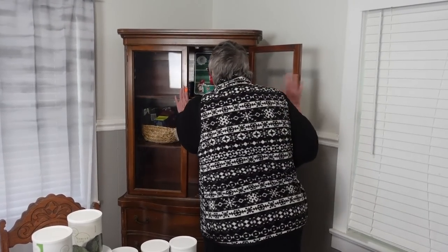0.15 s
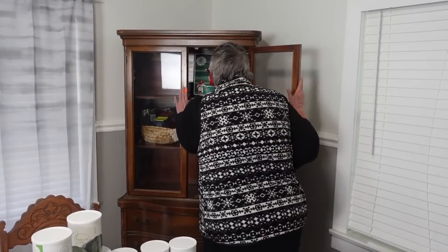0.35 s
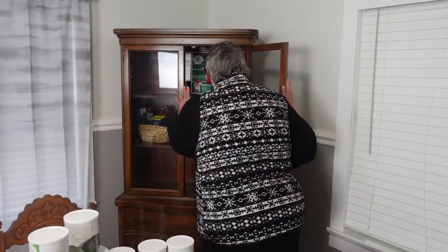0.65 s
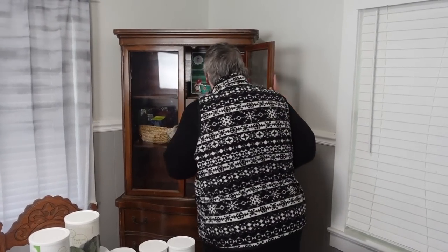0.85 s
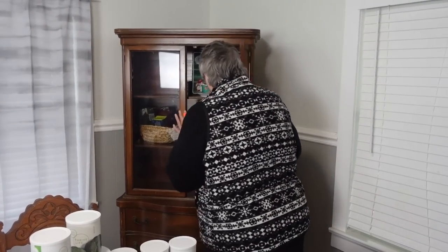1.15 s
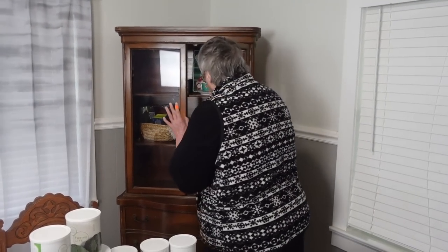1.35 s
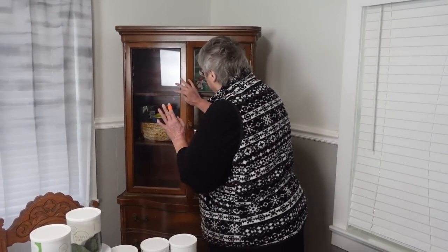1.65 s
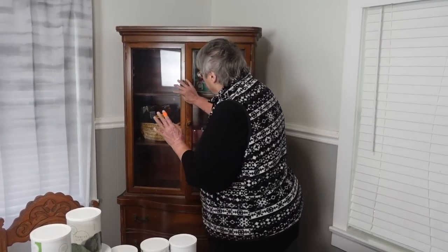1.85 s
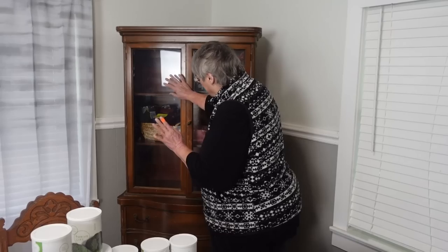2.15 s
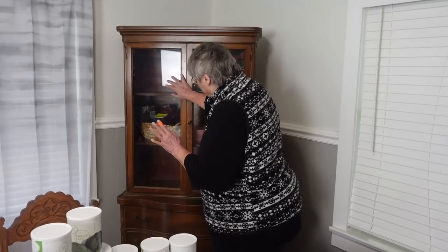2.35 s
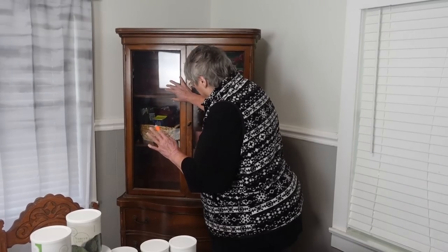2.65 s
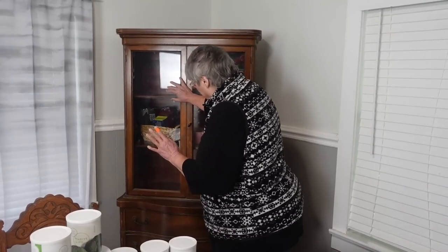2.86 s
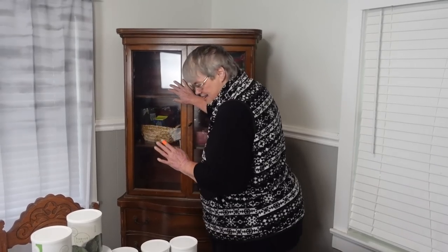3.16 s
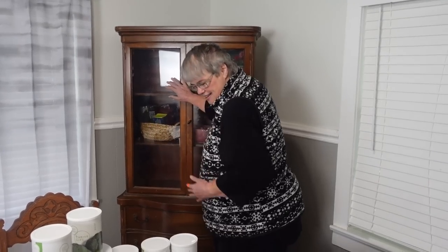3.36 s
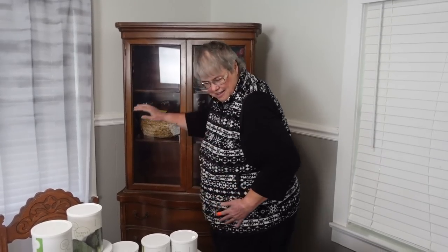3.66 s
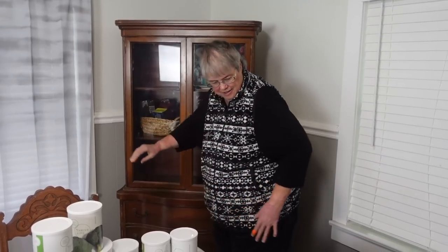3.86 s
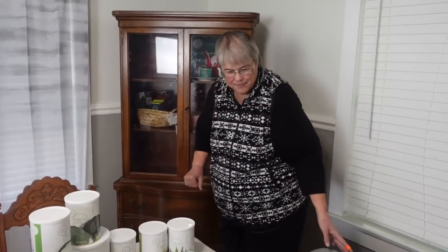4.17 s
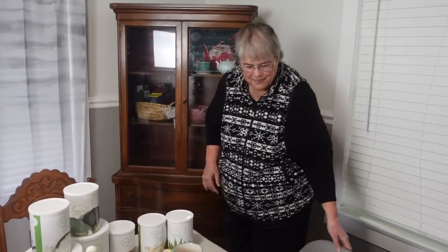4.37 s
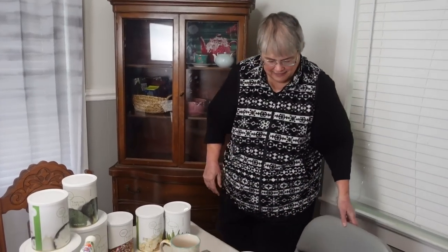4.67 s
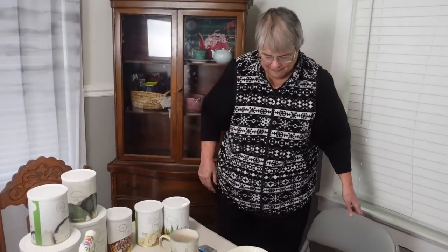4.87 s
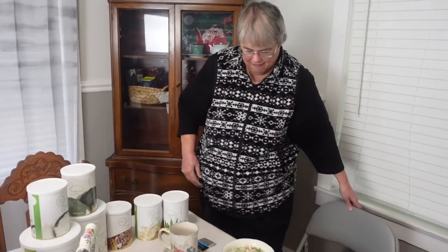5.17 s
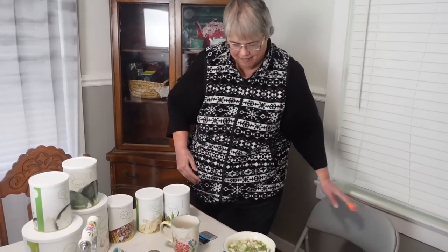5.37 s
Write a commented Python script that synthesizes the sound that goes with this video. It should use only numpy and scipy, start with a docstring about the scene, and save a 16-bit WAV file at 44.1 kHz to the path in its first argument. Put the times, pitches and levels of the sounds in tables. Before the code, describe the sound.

A bare dining room with a short, lively ring, heard from one microphone over deep unsteady air rumble and faint hiss. At about 0.3 s the left glazed cabinet door shuts with a tight burst of three hard woody knocks, its panes rattling as they fade. A tiny tick comes at 0.5 s, then near quiet. Sleeves swish from 1.4 to 2.3 s, with light low bumps of hands from 1.95 s. The right door closes at 2.4 to 2.55 s, with deeper, boomy thuds. Faint taps and handling knocks follow at 2.85 and around 3.2 s, with more cloth rustle from 3.4 to 4.5 s. A soft step falls near 4.1 s. From 4.5 s a folding chair is nudged, juddering and scraping grittily with a slight squeal and dry ticks. Heavy bumps at 4.9, 4.97 and 5.1 s are the loudest, ringing away under swollen hiss until 5.5 s.

```python
"""Two glazed doors of a wooden cabinet are pushed shut, one after the other, in a bare dining room.
Sleeves swish, hands bump the frames, then a folding chair is leaned on: it judders over the floor and bumps.
Blows are noise cracks and ringing tones that fade with the room; cloth and friction are shaped noise.
The chair's judder is a run of uneven slips shaking its frame. Small dry ticks are short noise bursts.
Air rumbles under a hiss that sinks, then swells while the chair moves; a limiter flattens the loudest peaks."""
import sys
import numpy as np
from scipy import signal
from scipy.io import wavfile
from scipy.ndimage import uniform_filter1d, minimum_filter1d

SR = 44100
rng = np.random.default_rng(int(sys.argv[2]) if len(sys.argv) > 2 else 0)


def generate_wav(sig):
    """Save sig (samples, or channels by samples) to the path in sys.argv[1] as 16-bit PCM at SR."""
    pcm = np.round(np.clip(np.atleast_2d(sig).T, -1, 1) * 32767).astype(np.int16)
    wavfile.write(sys.argv[1], SR, pcm)


N = 243431  # length of the scene in samples

# Deep rumble of the air. Each row: frequency in Hz, strength in dB per Hz (relative).
RUMBLE_COLOUR = [(12, 8.5), (20, 13.5), (30, -19), (42, -9), (60, -20.5), (100, -39)]
# Level of the background hiss, swelling late with the fading sound of the chair.
# Each row: time in seconds, level in dB.
HISS_LEVEL = [(0.2, -40), (0.8, -46.5), (1.4, -45), (2.95, -47.5), (3.4, -43.5), (4.0, -46), (4.5, -38),
              (5.25, -33.5), (5.52, -37)]
# Colour of the background hiss. Each row: frequency in Hz, strength in dB per Hz (relative).
HISS_COLOUR = [(41, -41), (70, 2), (155, -12.5), (293, -8.5), (336, -13.5), (620, -18), (892, -20.5),
               (1100, -21.5), (1610, -23), (1760, -22), (1980, -22.5), (4800, -31.5), (16000, -49)]
# How long the room rings. Each row: frequency in Hz, time to fade by 60 dB in seconds.
ROOM_FADE = [(60, 0.52), (200, 0.55), (600, 0.54), (2000, 0.63), (5000, 0.7), (9000, 0.54), (16000, 0.4)]

# Strokes of cloth on cloth. Each row: start in seconds, attack in seconds, hold in seconds,
# level in dB, brightness in dB (hiss against the soft body).
SWISHES = [(0.828, 0.17, 0.2, -60.5, 7.5), (1.25, .02, .015, -58, 0), (1.418, 0.038, .015, -48.5, -5),
           (1.487, 0.12, 0.083, -35, -0.5), (1.907, 0.021, .07, -38, -1), (1.937, 0.12, 0.078, -29, -3.5),
           (2.314, 0.16, 0.052, -33, -4.5), (3.437, 0.0056, 0.009, -34, -8), (3.444, 0.08, 0.054, -38, 3),
           (3.786, 0.06, 0.019, -35.5, -3), (4.074, 0.026, 0.032, -30.5, 0), (4.235, .036, 0.043, -40.5, 4),
           (4.394, 0.016, 0.0055, -35.5, -3.5), (4.474, .014, 0.018, -44, -2)]
# Colour of rubbed cloth. Each row: frequency in Hz, strength in dB per Hz (relative).
CLOTH_COLOUR = [(150, -46), (250, -1.5), (319, -3.5), (360, 0), (436, -2.5), (547, 0), (597, -2.5),
                (955, -1.5), (1180, -3.5), (1580, -4), (4490, -7), (12300, -27.5), (16000, -28)]
# Small dry ticks. Each row: start in seconds, relative level in dB, lowest frequency in Hz.
TICKS = [(0.5094, -29, 4000), (1.262, -43, 4000), (2.44, -15, 11000), (2.5554, -38, 11000),
         (2.6544, -32, 9000), (2.946, -43, 1500), (3.095, -30.5, 600), (3.44, -32, 5000),
         (4.4545, -33, 10600), (4.4635, -35, 9500), (4.536, -25, 3500), (4.683, -22, 6500),
         (4.897, -20, 5000)]

# Shoves that drag the chair. Each row: start in seconds, attack in seconds, hold in seconds,
# judder in dB (relative), friction in dB (relative), average slips per second.
DRAGS = [(4.39, 0.022, 0.011, -60, -39, 55), (4.486, .13, 0.034, -22, -29.5, 80),
         (4.71, 0.051, 0.08, -28.5, -29.5, 73), (4.896, 0.033, 0.1, -21, -32, 100),
         (5.072, 0.016, .04, -16.5, -30, 125)]
# Squeal of the chair's feet. Each row: frequency in Hz, width in Hz, level in dB (relative).
SQUEAL_LINES = [(1387, 34, 2), (1570, 45, -2), (1950, 79, -6.5), (2130, 61, -3), (2460, 66, -6),
                (2890, 120, -14), (7300, 400, -36), (12000, 2000, -10)]
# Gritty hiss of the dragging feet. Each row: frequency in Hz, strength in dB per Hz (relative).
GRIT_COLOUR = [(500, 5), (1000, 1.5), (2200, -29), (3200, -6), (6000, -16), (9000, -16.5), (13000, -30),
               (16000, -24)]

# Steps towards the chair, then its bumps. Each row: start in seconds, strength in dB,
# weight in dB (bass against the knock), hardness in dB (treble against the knock),
# contact in dB (the short dead knock against the ring).
CHAIR_BLOWS = [(4.079, -30.5, 4.5, -11, 14), (4.205, -41, 4.5, 2, 8), (4.285, -49, 11.5, -13, 3),
               (4.406, -47, 4, 11.5, 1), (4.478, -31, -3.5, -15, -14), (4.520, -21.5, -11.5, -18, 7),
               (4.685, -29, -22, -7, 2.5), (4.845, -27.5, -6, -34, -13), (4.8950, -8, -6, -10.5, -7),
               (4.966, -11.5, 2, -15, 0), (5.081, -6, 1, -17.5, 6.5), (5.118, -12, 4, -16.5, -6)]
# Blows on the left and right doors. Each row: start in seconds, strength in dB,
# weight in dB, hardness in dB, contact in dB, as for the chair.
LEFT_BLOWS = [(0.135, -34.5, -4.5, -27, -16), (0.2785, -12, 1.5, -1.5, 0), (0.303, -10, -2, -32, 12.5),
              (0.353, -11, -3, -9.5, 6)]
RIGHT_BLOWS = [(1.951, -35, 5.5, -5, 4), (2.048, -27.5, 10.5, -7.5, 0), (2.135, -31.5, 6.5, -1, -10),
               (2.215, -42.5, 15.5, -17, -4), (2.315, -34, 11, -10.5, -19), (2.4250, -12, 4, .5, -1),
               (2.495, -15, -7, -12, 1), (2.545, -20.5, 1, -11, 8), (2.853, -36.5, 4, -35, 8.5),
               (3.182, -28, -5, -29, 5.5), (3.189, -31.5, -9, -10, 9), (3.213, -34, 6.5, -10, 10),
               (3.4405, -38.5, -3, 1, 9.5)]
# Thud, knock, clack and top snap. Each row: lowest frequency in Hz, highest frequency in Hz.
REGISTERS = [(35, 150), (150, 900), (900, 7000), (7000, 17000)]
# Colour of each struck thing. Each row: frequency in Hz, strength in dB per Hz (relative).
CHAIR_COLOUR = [(35, -40), (60, -15.5), (108, -14.5), (180, -16.5), (287, -9.5), (315, -9.5), (437, -9),
                (469, -14.5), (1340, -17), (1620, -12.5), (2970, -24.5), (4320, -26.5), (10300, -48),
                (12400, -45), (16000, -70)]
LEFT_COLOUR = [(35, -35), (60, -30), (98, -1.5), (156, -21), (180, -7.5), (245, 1.5), (480, -11.5),
               (607, -13.5), (682, -22), (749, -13.5), (1140, -15), (1860, -17.5), (2650, -24),
               (5090, -18.5), (16000, -39)]
RIGHT_COLOUR = [(24, -31), (40, 11.5), (64, 3.5), (176, -3), (262, -5), (337, -6.5), (372, -9), (467, -5.5),
                (529, 5), (585, -10.5), (1340, -20), (1760, -23), (3650, -30), (4800, -28), (16000, -64)]
# Tones each thing rings with. Each row: frequency in Hz before a small random shift,
# level in dB (relative), time to fade by 60 dB in seconds.
CHAIR_MODES = [(114.4, 0, 0.31), (164.5, -2, 0.18), (209.2, 0.5, 0.27), (236.6, -5, 0.33), (289, 1.5, 0.37),
               (346, -17, 0.25), (370, -31, 0.67), (433, -28, 0.17), (505, -16.5, 0.57),
               (564.5, -5.5, 0.38), (680, -34, .5), (978, -19, 0.56), (1412, -21, 0.97), (1476, -15, 0.96),
               (1743, -7.5, 0.49), (1790, -33, .6), (11950, -48, .4)]
LEFT_MODES = [(82, -15.5, 1.23), (101.6, -6, 0.6), (189.2, -4, 0.63), (213, -1, 0.49), (249, -2.5, 0.46),
              (338, -3.5, 0.31), (447, -15.5, 0.55), (531, -12, 0.54), (759, -4.5, 0.22), (976, -6.5, 0.26),
              (1234, -14, 0.36), (1284, -24, 1), (1927, -11, 0.26), (2304, -4.5, 0.16), (4678, -32, .35),
              (5577, -28, .5), (5660, -28, .5)]
RIGHT_MODES = [(59.8, 5, 0.45), (83.1, 2, 0.69), (121, 2.5, 0.7), (229.7, 0.5, 0.68), (258, 3.5, 0.61),
               (374.7, 4, 0.46), (529, 2.5, 0.56), (625, -15, 0.71), (723, -4, 0.42), (896, -11.5, 0.74),
               (1287, -13, 0.54), (2137, -9, 0.29), (3240, -6, 0.11), (3892, -12, 0.28), (4830, -9.5, 0.36)]

CUTOFF_HZ = 15850
RUMBLE_DB, GUST_DB = -19.5, 1.5   # middle level of the rumble, size of its gusts
SWISH_RELEASE_DB_PER_S, SHEEN_RELEASE_DB_PER_S = 107, 134   # the room swallows the very top sooner
DRAG_RELEASE_DB_PER_S = 116
SNAP_GROWTH = 0.64   # extra dB of top snap for each dB of clack


def from_db(db):
    """Turn decibels into a gain."""
    return 10 ** (np.asarray(db) / 20)


def rms_one(x):
    """Scale a sound to an average (RMS) level of 1."""
    return x / np.sqrt(np.mean(x ** 2) + 1e-20)


def early_rms_one(x):
    """Scale a sound to level 1 over its first sixteenth of a second."""
    return x / np.sqrt(np.mean(x[:SR // 16] ** 2))


def at_hz(points, hz):
    """Read a table at a frequency, with straight lines on a log-frequency axis."""
    table_hz, values = np.array(points).T
    return np.interp(np.log(hz), np.log(table_hz), values)


def band(x, low, high, order=2):
    """Keep only the frequencies between low and high."""
    edges = [low, min(high, .47 * SR)]
    return signal.sosfilt(signal.butter(order, edges, "band", fs=SR, output="sos"), x)


def noise(colour, size, t60=None):
    """Noise in bands of the given colour; with a fade table each band dies away at its own pace."""
    edges = np.geomspace(11, 17500, 28)
    white = rng.standard_normal((2, size + SR // 2))   # the extra half second lets the filters settle
    t = np.arange(size) / SR
    out = 0
    for k, (low, high) in enumerate(zip(edges, edges[1:])):
        hz = np.sqrt(low * high)
        if colour[0][0] <= hz <= colour[-1][0]:
            part = rms_one(band(white[k % 2], low, high)[-size:])   # neighbours use separate noise
            part = part * np.sqrt(high - low) * from_db(at_hz(colour, hz))
            if t60 is not None:
                part = part * np.exp(-np.log(1000) * t / at_hz(t60, hz))
            out = out + part
    return out


def slow_chance(low_hz, high_hz):
    """A random wander with an average (RMS) size of 1."""
    return rms_one(band(rng.standard_normal(N + SR), low_hz, high_hz)[SR:])


def stroke(start_s, attack_s, hold_s, release_db_per_s):
    """Level of one rubbing movement: it gathers speed, holds, and dies away with the room."""
    t = np.arange(N) / SR - start_s
    rise = np.sin(np.pi / 2 * np.clip(t / attack_s, 0, 1)) ** 2
    return rise * from_db(-release_db_per_s * np.clip(t - attack_s - hold_s, 0, 2))


def air():
    """Rumble that swells and sinks at random, under a hiss that sinks and then swells while the chair moves."""
    gusts = from_db(RUMBLE_DB + GUST_DB * slow_chance(3.0, 5.2))
    rumble = gusts * rms_one(noise(RUMBLE_COLOUR, N))
    times, levels_db = np.transpose(HISS_LEVEL)
    hiss_gain = from_db(np.interp(np.arange(N) / SR, times, levels_db))
    return rumble + hiss_gain * rms_one(noise(HISS_COLOUR, N))


def sleeves(split_hz=2700, sheen_hz=7000, sheen_db=-9.0, grain_db=0.6):
    """Countless fibres catch and let go: a soft body, a finely grained hiss and a short-lived sheen."""
    rub = noise(CLOTH_COLOUR, N)
    grain = from_db(grain_db * rms_one(uniform_filter1d(rng.standard_normal(N), size=90)))
    body = rms_one(band(rub, 314, split_hz, order=3))
    hiss = rms_one(band(rub, split_hz, sheen_hz, order=3) * grain)
    sheen = rms_one(band(noise(CLOTH_COLOUR, N), sheen_hz, CUTOFF_HZ, order=3) * grain)
    sheen = from_db(sheen_db) * sheen
    power = 0
    for s, attack_s, hold_s, db, brightness_db in SWISHES:
        slow = from_db(db) * stroke(s, attack_s, hold_s, SWISH_RELEASE_DB_PER_S)
        fast = from_db(db) * stroke(s, attack_s, hold_s, SHEEN_RELEASE_DB_PER_S)
        bright = from_db(brightness_db)
        power = power + np.array([slow, slow * bright, fast * bright]) ** 2   # strokes add as power
    return np.sum(np.sqrt(power) * [body, hiss, sheen], axis=0)


def ticks(high_hz=15500, decay_s=0.0012, tail_db=-17, tail_s=0.049, level_db=-8):
    """Tiny hard contacts: bursts of noise that die at once and leave a faint trail."""
    t = np.arange(SR // 4) / SR
    fade = np.exp(-t / decay_s) + from_db(tail_db) * np.exp(-t / tail_s)
    out = np.zeros(N + SR)
    for s, db, low_hz in TICKS:
        burst = rms_one(band(rng.standard_normal(len(t)), low_hz, high_hz))
        at = round(s * SR)
        out[at:at + len(t)] += from_db(db + level_db) * burst * fade
    return out[:N]


def ringing(modes, t, detune=0.00767):
    """Loose panes and joints shift each mode a little at every blow and split it into a close pair."""
    out = 0
    for hz, db, t60 in modes:
        pair_hz = hz * (1 + detune * rng.standard_normal((2, 1)))
        phase = 2 * np.pi * (rng.random() + np.array([[0], [1 / 4]]))   # a quarter turn apart
        fade = from_db(db) * np.exp(-np.log(1000) * t / t60)
        out = out + fade * np.sin(2 * np.pi * pair_hz * t + phase).sum(0)
    return out


def struck(colour, modes, contact_db, ring_db, contact_s, crack_db, crack_s, rattle_db=1.5, rattle_s=0.16):
    """Answer to one blow: a hard crack, a short dead knock at the contact, the ringing modes and the room."""
    t = np.arange(SR * 9 // 10) / SR
    dead = noise(colour, len(t))
    crack = from_db(crack_db) * rms_one(np.gradient(dead)) * np.exp(-t / crack_s)   # slope = brighter
    contact = from_db(contact_db) * (rms_one(dead) * np.exp(-t / contact_s) + crack)
    rattle = rms_one(band(rng.standard_normal(len(t)), 25, 220))
    chatter = from_db(rattle_db * rattle * np.exp(-t / rattle_s))   # loose parts chatter at first
    room = early_rms_one(noise(colour, len(t), ROOM_FADE) * chatter)
    ring = from_db(ring_db) * early_rms_one(ringing(modes, t))
    swell = 1 - np.exp(-t / 0.0037)   # the blow takes a moment to spread
    return contact + swell * early_rms_one(room + ring)


def blows(table, colour, modes, snap_db, **build):
    """Each blow is drawn afresh: weight sets its thud, hardness its clack, and louder clacks snap more on top."""
    out = np.zeros(N + 2 * SR)
    for s, db, weight_db, hardness_db, contact_db in table:
        answer = struck(colour, modes, contact_db, **build)
        at = round(s * SR)
        top_db = hardness_db + snap_db + SNAP_GROWTH * (db + hardness_db)
        for (low, high), register_db in zip(REGISTERS, (weight_db, 0, hardness_db, top_db)):
            part = early_rms_one(band(answer, low, high, order=3))
            out[at:at + len(answer)] += from_db(db + register_db) * part
    return out[:N]


def squeal(flare_db=2, glide=.022):
    """Narrow friction resonances that waver in pitch together, each flaring up and fading at random."""
    warped_s = np.cumsum(1 + glide * slow_chance(2.01, 7.35)) / SR   # time runs a little fast or slow
    out = 0
    for hz, width, db in SQUEAL_LINES:
        line = slow_chance(0.81, width / 2) * np.sin(2 * np.pi * hz * warped_s)
        flare = flare_db * np.tanh(slow_chance(3.6, 14))
        out = out + from_db(db + flare) * rms_one(line)
    return out


def chair(squeal_db=-12, grit_db=-8.5):
    """The feet stick and slip unevenly, each slip shaking the frame; footsteps and bumps join in."""
    slips, rubbing = 0, 0
    for s, attack_s, hold_s, judder_db, friction_db, per_s in DRAGS:
        push = stroke(s, attack_s, hold_s, DRAG_RELEASE_DB_PER_S)
        pace = per_s * rng.exponential(1, N // 256 + 1).repeat(256)[:N]
        clicks = np.diff(np.floor(np.cumsum(pace) / SR), prepend=0)   # one click at each slip
        slips = slips + clicks * push * from_db(judder_db) * np.sqrt(SR / per_s)
        rubbing = np.hypot(rubbing, push * from_db(friction_db))
    frame = struck(CHAIR_COLOUR, CHAIR_MODES, contact_db=-1, ring_db=16,
                   contact_s=0.028, crack_db=-12, crack_s=.003)
    frame = band(frame, 174, 434)
    uneven_slips = slips * from_db(rng.normal(0, 0.38, N))
    drag = signal.fftconvolve(uneven_slips, frame / np.sqrt(np.sum(frame ** 2)))[:N]
    grit = rms_one(noise(GRIT_COLOUR, N))
    friction = from_db(squeal_db) * squeal() + from_db(grit_db) * grit
    bumps = blows(CHAIR_BLOWS, CHAIR_COLOUR, CHAIR_MODES, snap_db=-6.5, ring_db=-1,
                  contact_s=0.014, crack_db=-32, crack_s=.005)
    return drag + rubbing * friction + bumps


def doors():
    """Wooden frames hit their catches and the panes rattle after them."""
    left = blows(LEFT_BLOWS, LEFT_COLOUR, LEFT_MODES, snap_db=-1.5, ring_db=-3.0,
                 contact_s=0.0095, crack_db=-15, crack_s=0.0029)
    right = blows(RIGHT_BLOWS, RIGHT_COLOUR, RIGHT_MODES, snap_db=-9.5, ring_db=-4.0,
                  contact_s=0.012, crack_db=-29, crack_s=0.0023)
    return left + right


def scene():
    """All sources meet at one microphone."""
    return (air() + sleeves() + ticks() + chair() + doors())[None]


def record(dry, ceiling_db=-0.63, release_db_per_s=70):
    """A look-ahead limiter ducks at each peak and recovers at a steady pace; then the top is cut."""
    over = np.maximum(20 * np.log10(np.abs(dry[0]) + 1e-9) - ceiling_db, 0)
    fall = release_db_per_s * np.arange(N) / SR
    duck = fall - np.maximum.accumulate(over + fall)
    duck = uniform_filter1d(minimum_filter1d(duck, size=65), size=65)   # start early, move smoothly
    top_cut = signal.ellip(10, .1, 90, CUTOFF_HZ, fs=SR, output="sos")
    return signal.sosfilt(top_cut, dry * from_db(duck))


dry = scene()
out = record(dry)
generate_wav(out)
```